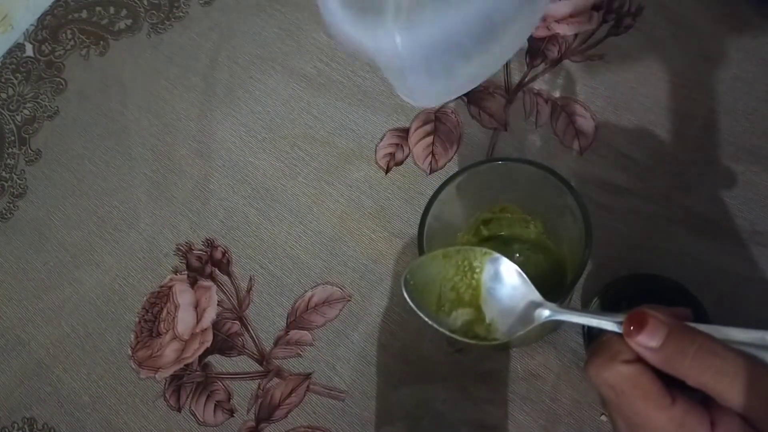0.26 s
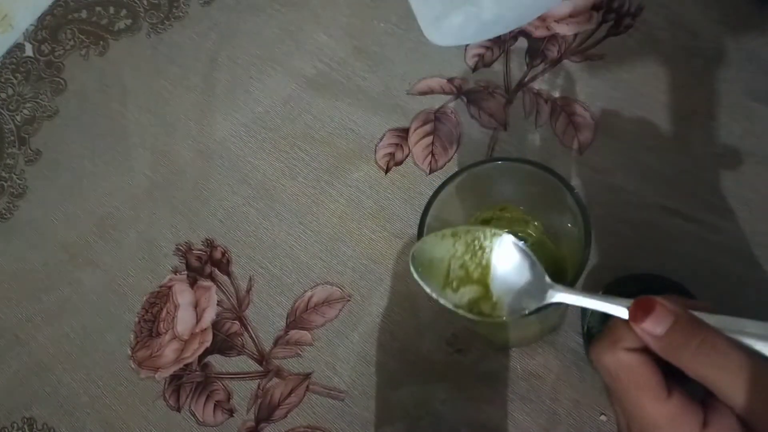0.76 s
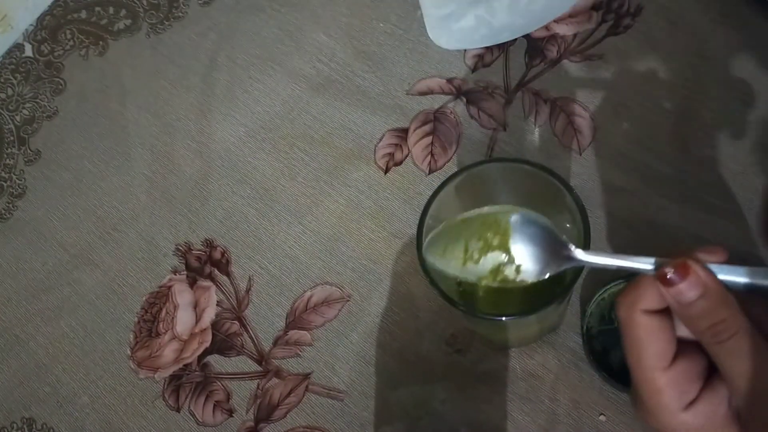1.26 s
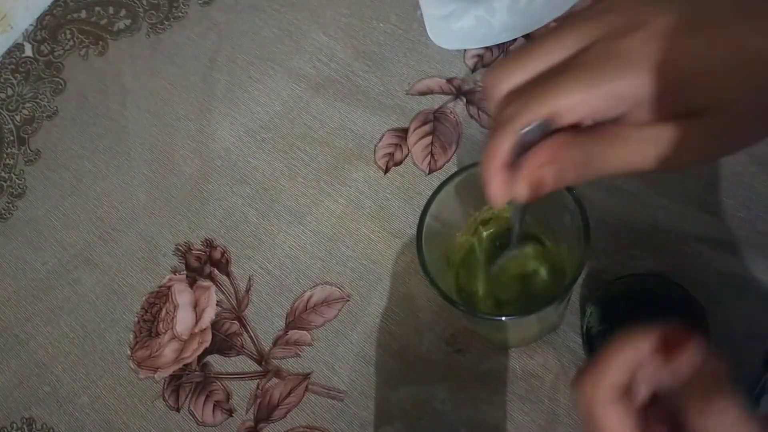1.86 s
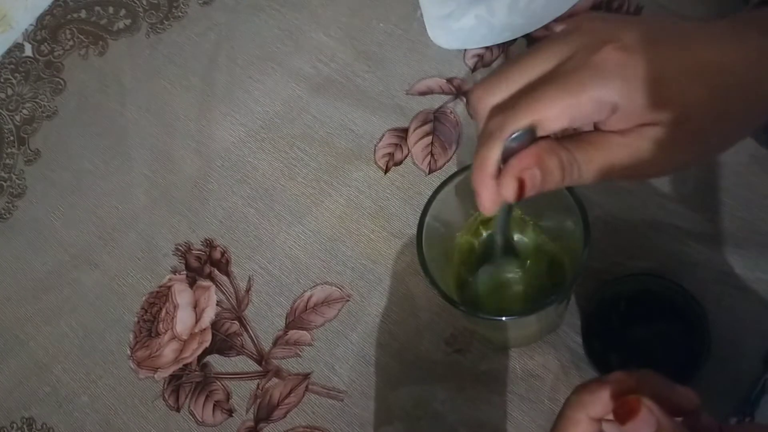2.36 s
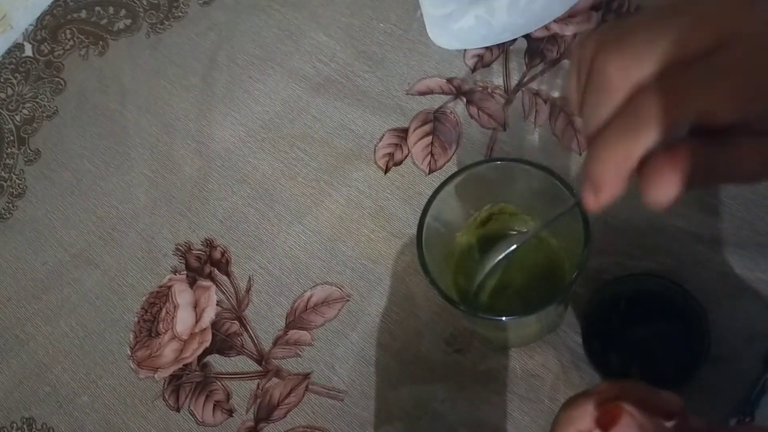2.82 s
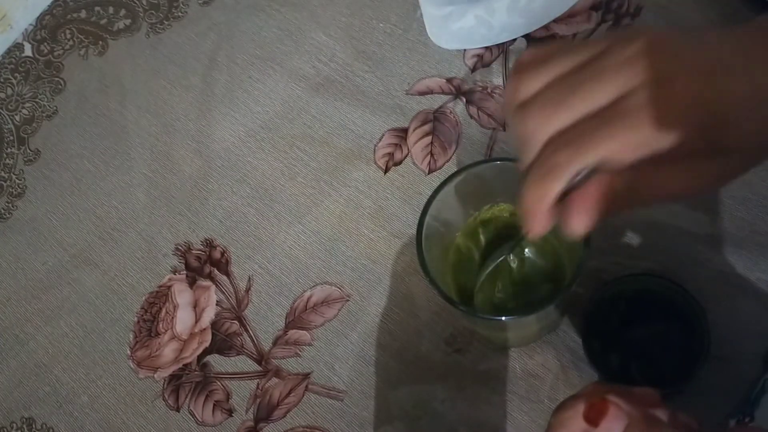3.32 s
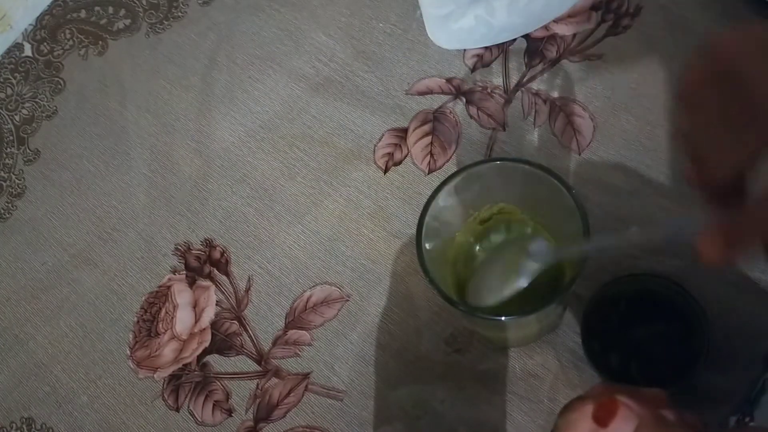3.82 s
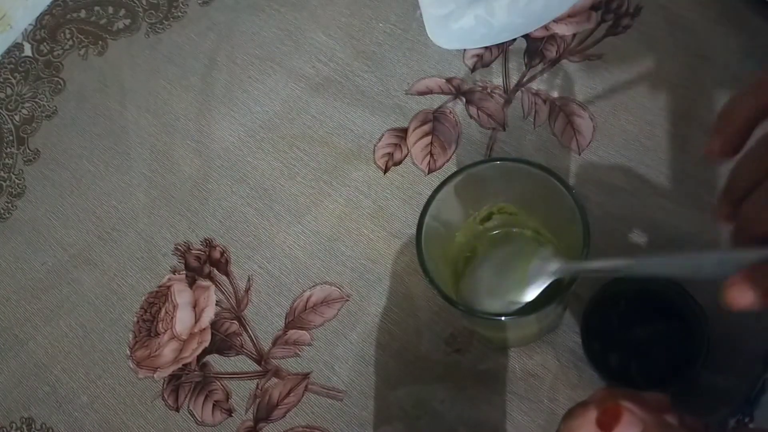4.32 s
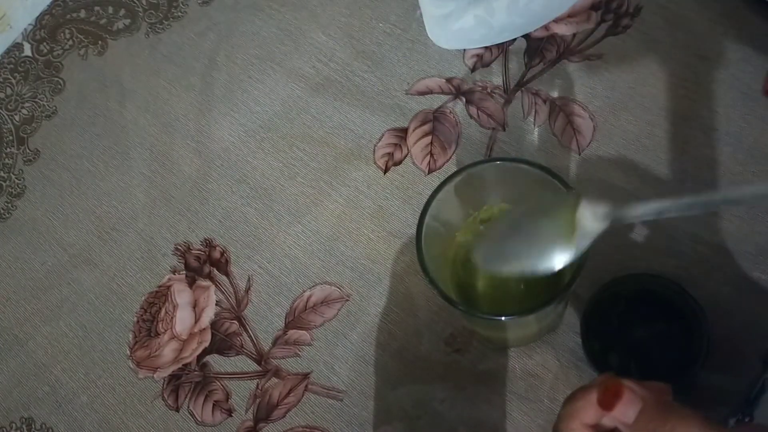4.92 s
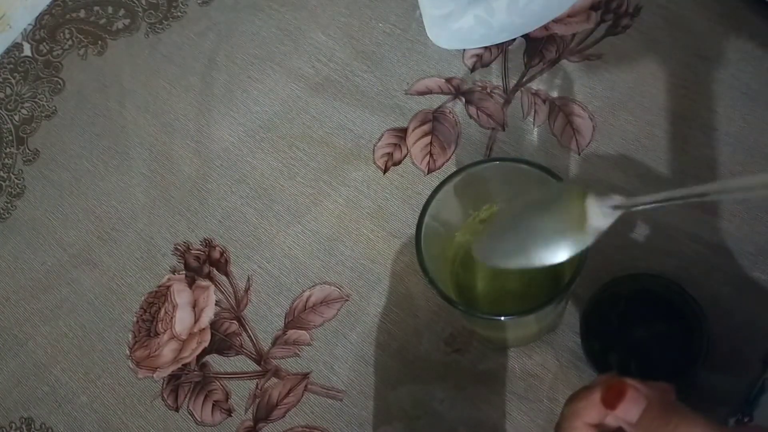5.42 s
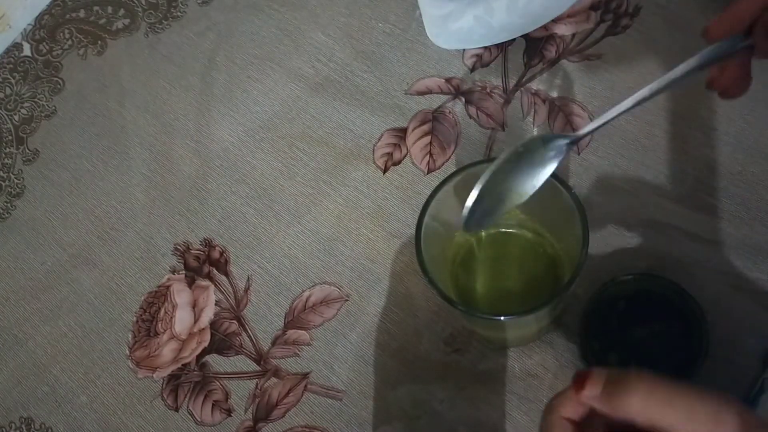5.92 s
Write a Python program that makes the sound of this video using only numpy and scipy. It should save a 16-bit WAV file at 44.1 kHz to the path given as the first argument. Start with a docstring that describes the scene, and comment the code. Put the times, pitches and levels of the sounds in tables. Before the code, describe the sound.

A few drips and a jug set down, then a steel spoon clinks sharply in a glass, stirring over a ceiling fan's hum.

```python
"""Last drops fall from a plastic jug into a glass of water, over the hum and throb of a three-bladed
ceiling fan in a small kitchen. The jug is set down and the table top booms. Then the main sound, close
under the phone's microphone: a steel spoon stirs in powder and knocks the wall of the glass, and both
steel and glass ring. Soft swishes of hiss come and go; the kitchen's steady noise lies behind it all."""
import sys
import numpy as np
from scipy import signal
from scipy.fft import rfft, irfft, next_fast_len
from scipy.io import wavfile
from scipy.ndimage import uniform_filter1d

SR = 44100
rng = np.random.default_rng(int(sys.argv[2]) if len(sys.argv) > 2 else 0)


def wrap_up_sound(samples):
    """Save the sound to the file named by the first command line argument, as 16-bit audio."""
    columns = np.atleast_2d(samples).T
    # keep every value between -1 and 1, then stretch to whole-number steps
    tamed = np.clip(columns, -1, 1)
    steps = np.round(tamed * 32767).astype(np.int16)
    wavfile.write(sys.argv[1], SR, steps)


N = 272394


def undb(db):
    """Gain of a level in dB."""
    return 10 ** (np.asarray(db) / 20)


def level(x, db):
    """Scale to an rms level."""
    return x * undb(db) / np.sqrt(np.mean(x ** 2))


def colour(x, points):
    """Shape a sound by (Hz, dB) points."""
    hz, db = np.transpose(points)
    size = next_fast_len(len(x))
    bins = np.maximum(np.arange(size // 2 + 1) * SR / size, 1)
    gain = undb(np.interp(np.log(bins), np.log(hz), db))
    return irfft(rfft(x, size) * gain, size)[:len(x)]


def band(x, hz, width_hz):
    """One resonance."""
    return signal.lfilter(*signal.iirpeak(hz, hz / width_hz, fs=SR), x)


def walk(rate_hz):
    """A smooth random drift with a spread near 1."""
    hold = int(SR / rate_hz)
    steps = np.repeat(rng.standard_normal(N // hold + 1), hold)
    return 1.3 * uniform_filter1d(uniform_filter1d(steps, hold), hold)[:N]


def add(out, start_s, sound):
    """Mix a sound in at its start time."""
    i = int(start_s * SR)
    out[i:i + len(sound)] += sound[:N - i]


def ring(hz, t60, attack_s, turn=0):
    """A struck mode: it swells for twice attack_s, then dies away."""
    t = np.arange(int(SR * (t60 + 4 * attack_s))) / SR
    swell = np.sin(np.pi / 2 * np.minimum(t / (2 * attack_s), 1)) ** 2
    fade = np.exp(-np.log(1000) * np.maximum(t - 2 * attack_s, 0) / t60)
    return swell * fade * np.sin(2 * np.pi * (hz * t + turn))


def burst(decay_s, attack_s=.0001):
    """A short spit of noise."""
    t = np.arange(2600) / SR
    return rng.standard_normal(len(t)) * np.exp(-t / decay_s) * (1 - np.exp(-t / attack_s))


SHAFT_HZ, SLOTS, BLADES = 4.35293, 84, 3  # the fan overhead
# Room tone of the kitchen. Each row: frequency in Hz, relative noise density in dB.
ROOM_TONE = [(40, -42), (140, -26.5), (260, -21.5), (440, -17), (540, -24.5), (700, -19.5), (1320, -25),
             (2600, -33.5), (4000, -50), (6000, -55), (6950, -48), (7700, -57), (8600, -50), (11000, -63),
             (16300, -78)]


def kitchen(t):
    """Distant household noise and air from the fan, puffing once a turn and swelling a little."""
    puff_db = 2.5 * np.exp(-((SHAFT_HZ * t + 0.059) % 1) / 0.17)
    swell = undb(uniform_filter1d(puff_db, size=900) + .4 * walk(1.5) + .9 * walk(9))
    return level(colour(rng.standard_normal(N) * swell, ROOM_TONE), db=-45.5)


# Reverberation of the small kitchen. Each row: frequency in Hz, time to fall 60 dB in seconds.
ROOM_DECAY = [(100, 0.53), (2000, 0.35), (8000, 0.28), (16000, 0.12)]


def room(close, echo_db=-14):
    """The walls' many echoes reach the microphone behind the close sound, as bands of fading noise."""
    t, tail = np.arange(SR // 2) / SR, 0
    hz, t60 = np.transpose(ROOM_DECAY)
    for centre in 125 * 2. ** np.arange(8):
        fade = np.exp(-np.log(1000) * t / np.interp(np.log(centre), np.log(hz), t60))
        tail += band(rng.standard_normal(len(t)), centre, centre * 0.57) * fade
    tail *= 1 - np.exp(-t / 0.007)
    tail /= np.sqrt(np.sum(tail ** 2))
    return close + undb(echo_db) * signal.fftconvolve(close, tail)[:N]


# Level of the low hum, raised around the jug's landings and the late clinks.
# Each row: time in seconds, level in dB.
HUM_LEVELS = [(0.0, -42.5), (0.1, -43.5), (0.26, -44.5), (0.65, -45.5), (0.83, -40), (1.03, -40.5),
              (1.43, -42.5), (1.86, -42), (4.06, -40), (4.18, -42), (5.28, -45.5), (5.9, -42),
              (6.07, -46.5), (6.18, -43.5)]


def fan_hum(t):
    """The rotor slots sing; the shaft wobbles once a turn and the blades throw shifted echoes."""
    turn = SHAFT_HZ * t
    wobble = 0.25 * np.sin(2 * np.pi * (turn - .42))
    tone = np.exp(2j * np.pi * SLOTS * turn + 1j * wobble)
    blade = np.exp(2j * np.pi * (BLADES * turn - 0.15))
    echoed = tone * (1 + 0.44 / blade + 0.051 * blade)  # one echo below the tone, a faint one above
    sway = 1 + 0.22 * np.cos(2 * np.pi * (turn + 0.037))  # the fan leans nearer and further
    return level(echoed.real * sway, 0) * undb(np.interp(t, *np.transpose(HUM_LEVELS)))


# Resonances of the fan's housing. Each row: frequency in Hz, filter width in Hz, level in dB.
HOUSING_BANDS = [(429, 23.5, -61), (677.8, 70, -52), (1316, 9.9, -73.5), (2584, 23, -70.5)]


def fan_whir(t):
    """Up at the ceiling, a rub once a turn rings the housing."""
    turn = SHAFT_HZ * t
    # the same spot rubs on every turn, so part of the noise repeats
    spot = rng.standard_normal(SR)[(turn % 1 * SR / SHAFT_HZ).astype(int)]
    throb = np.exp(0.46 * np.cos(2 * np.pi * (turn + 0.013)))
    rub = (0.4 * spot + rng.standard_normal(N)) * throb
    return sum(level(band(band(rub, hz, width), hz, width), db) for hz, width, db in HOUSING_BANDS)


# Soft swishes of hiss. Each row: peak time in seconds, level in dB, fade in dB per second.
SWISHES = [(.27, -77, 80), (.34, -74, 260), (4.66, -66, 35), (5.304, -65, 46), (5.55, -72.5, 128.5),
           (5.724, -67.5, 60), (5.95, -66, 50)]


def fine_hiss(t, attack_s=0.025):
    """Soft swishes, and the fading hiss after the last clink: each rises quickly and dies away."""
    gain = 0
    for peak_s, db, fade in SWISHES:
        rise = np.clip(1 + (t - peak_s) / attack_s, 0, 1) ** 2
        gain += rise * undb(db - fade * np.maximum(t - peak_s, 0))
    hiss = band(rng.standard_normal(N), 3600, 2300) + 0.41 * band(rng.standard_normal(N), 8400, 2500)
    flicker = undb(2.1 * walk(40))
    return gain * level(band(hiss, 5600, 7400) * flicker, db=0.53)


# Modes of the table top. Each row: frequency in Hz, relative level in dB, time to fall 60 dB in seconds.
TABLE_MODES = [(129.5, -2.5, 0.17), (160.8, -6, 0.2), (222, 3.5, 0.048), (271, 1, 0.073), (422, 1.5, 0.06),
               (560, 1, 0.024), (697, -7.5, 0.055), (922, -8.5, 0.053)]


def table_boom(blow_db):
    """The table under the glass booms, its modes balanced a little differently at each blow."""
    out = np.zeros(SR // 2)
    for hz, db, t60 in TABLE_MODES:
        scatter_db = 2.5 * rng.standard_normal()
        add(out, 0, undb(blow_db + db + scatter_db) * ring(hz, t60, 0.00089))
    return out


# The jug landing nearby. Each row: start in seconds, level in dB, gap between bounces in seconds.
JUG_LANDINGS = [(0.8212, -26.5, .011), (1.0823, -27.5, .025)]


def jug(bounces=2, bounce_thud_db=-3, bounce_slap_db=-10):
    """The jug's base booms the table, pushes the air and slaps faintly, weaker on each bounce."""
    thuds, slaps = np.zeros(N), np.zeros(N)
    for start_s, db, gap_s in JUG_LANDINGS:
        for bounce in range(bounces + 1):
            hit_s = start_s + bounce * gap_s
            slap_gain = undb(db + bounce * bounce_slap_db)
            add(thuds, hit_s, table_boom(db + bounce * bounce_thud_db))
            add(thuds, hit_s, 2.2 * slap_gain * ring(530, 0.011, 0.00028))  # the push of air
            add(slaps, hit_s, 1.4 * slap_gain * burst(0.0025))
    return thuds + band(band(band(slaps, 1500, 2300), 1500, 2300), 1800, 3000)


# Drops and small ticks, close to the microphone.
# Each row: start in seconds, tick level in dB, bubble's starting pitch in Hz, bubble level in dB.
DRIPS = [(.1674, -51, 3620, -62), (0.21, -66, 3500, -40.5), (.249, -31.5, 8060, -36),
         (0.2993, -60, 4540, -47), (.321, -48, 8500, -47), (0.337, -47, 4630, -37.5),
         (0.3536, -53, 7500, -46), (.3745, -49, 8800, -51), (0.408, -52, 8600, -53), (.719, -68, 4570, -57),
         (.994, -49, 8550, -43), (1.034, -42, 8700, -45), (1.071, -52, 8650, -49), (5.948, -60, 5000, -49)]


def drops(plop_db=-1.5):
    """A bright tick, a tiny bubble whose pitch rises as it surfaces, a plop of the air in the glass."""
    tones, ticks = np.zeros(N), np.zeros(N)
    t = np.arange(600) / SR
    envelope = np.exp(-t / 0.0013) * (1 - np.exp(-t / 0.0002))
    for start_s, tick_db, hz, bubble_db in DRIPS:
        bubble = envelope * np.sin(2 * np.pi * hz * t * (1 + 12 * t))
        add(tones, start_s, undb(bubble_db) * bubble)
        add(tones, start_s, undb(bubble_db + plop_db) * ring(1036, 0.032, 0.0026))
        add(ticks, start_s, undb(tick_db) * burst(0.0017))
    return tones + band(band(ticks, 8900, 5000), 9500, 8000)


def family_levels(crack_db, handle_db, bowl_db, glass_db, bright_db, in_drink):
    """How hard a blow drives each family of modes in spoon and glass, in dB."""
    return (handle_db,                                                   # 0 spoon handle
            glass_db,                                                    # 1 rim, low
            bowl_db,                                                     # 2 spoon bowl
            glass_db + 1.33 * bright_db + (-4.5 if in_drink else -8.5),  # 3 rim, 1.33 octaves up
            crack_db + (-13 if in_drink else -11),                       # 4 spoon tip
            glass_db + 1.76 * bright_db,                                 # 5 rim, high, near 9.3 kHz
            crack_db + (-22 if in_drink else -9),                        # 6 rim, top
            crack_db + (7.5 if in_drink else 4))                         # 7 spoon edge


# Modes of spoon and glass; the uneven glass splits its rings into twins. Each row: family number,
# twin 0 or 1, frequency in Hz, relative level in dB, time to fall 60 dB in seconds (spoon in air).
CLINK_MODES = [(0, 0, 1037, 0, .12), (0, 1, 990, -3, .09), (1, 0, 2057, 0, .36), (1, 1, 2031, 0, .36),
               (1, 0, 2116, -8, .22), (1, 0, 2159, -9, .22), (1, 1, 2465, -18, .15), (2, 0, 3075, -1, .07),
               (2, 0, 3190, -7, .08), (2, 1, 3440, 0, .07), (3, 1, 5178, 0, .34), (3, 0, 5196, -2, .3),
               (3, 0, 5060, -14, .2), (3, 1, 5360, -18, .2), (4, 0, 6551, 0, .09), (4, 1, 7400, -6, .07),
               (5, 0, 9240, -2, .17), (5, 0, 9320, -3, .22), (5, 1, 9440, -4, .21), (5, 1, 9157, -8, .2),
               (5, 0, 9385, -7, .22), (6, 0, 14510, 0, .15), (6, 1, 14490, -1, .14), (6, 0, 13455, -8, .1),
               (6, 1, 4484, -3, .08), (7, 0, 8350, -4, .06), (7, 1, 8500, -3, .07), (7, 0, 8620, -3, .07),
               (7, 1, 8900, -6, .06)]


def struck_modes(family_db, place, contact_s, lasting_db, in_drink):
    """Each mode clanks while spoon and glass touch, then leaves a thinner, lasting ring."""
    twin_gain = np.cos(2 * np.pi * place), np.sin(2 * np.pi * place)
    ring_share = 0.64 if in_drink else 1
    for family, twin, hz, db, t60 in CLINK_MODES:
        turn, detune = rng.random(), rng.random() - .5
        gain = twin_gain[twin] * undb(family_db[family] + db)
        # in touch, the two bodies damp and detune each other
        clank = 1.18 * gain * ring(hz * (1 + 0.015 * detune), 0.19 * t60, contact_s, turn)
        free = gain * ring(hz * (1 + 0.0011 * detune), ring_share * t60, contact_s, turn)
        wall_db = -2.26 * np.log2(hz / 2000)  # the wet wall soaks up the high rings most
        yield family, clank, undb(lasting_db + wall_db) * free


# Tone of the crack of steel on glass. Each row: frequency in Hz, gain in dB.
CRACK_TONE = [(300, 16), (1000, 21), (2000, 21.5), (3200, 20), (5500, 7.5), (7500, 17.5), (8500, 11.5),
              (9800, 17), (12000, 4), (15000, -1), (16400, -20)]
# Blows of the spoon. Each row: start in seconds, levels of crack, handle, bowl and glass in dB,
# glass brightness in dB per octave, place round the rim in turns, contact in ms (capped at 8 below),
# relative level of the lasting ring in dB.
SPOON_BLOWS = [(1.537, -28, -24, -29, -27, 4.5, 0.072, .6, -3.5),
               (1.5504, -46.5, -31, -41, -29.5, 4.5, 0.16, 0.59, -4.5),
               (1.5784, -30, -26.5, -26.5, -23, 2.7, 0.064, 0.91, -11.5),
               (1.5853, -44.5, -42, -46, -26.5, -5, .068, 0.99, -10),
               (1.6485, -27, -38, -34, -27.5, 2, 0.091, 1.03, -8.5),
               (1.8744, -34, -34.5, -33, -21.5, 1, 0.18, 0.83, -1),
               (2.2350, -59, -32.5, -43, -51, -7, 0.13, 1.1, -10),
               (2.4015, -38.5, -26.5, -22, -27, -17, 0.19, 0.62, -6.5),
               (2.5358, -29, -35.5, -19.5, -31, -3, 0.061, 1.36, -6.5),
               (2.6523, -53.5, -47, -39, -35.5, -10.5, 0.13, 0.51, -27),
               (2.6600, -64, -31.5, -30, -61, -4, 0.11, 0.32, -14),
               (2.7604, -76.5, -40, -51, -53, -13, 0.11, 0.72, -8),
               (2.7817, -65, -40, -47, -50, -11, 0.11, 0.64, -11),
               (3.1887, -40, -33, -47, -38.5, -9, 0.076, 0.92, -2),
               (3.2131, -47.5, -39, -44, -43, -11, 0.061, 1.7, -7),
               (3.3917, -80, -34.5, -40.5, -50, -14, 0.019, 2.2, -10),
               (4.0498, -32.5, -22.5, -36.5, -46.5, 8.5, 0.15, 3.6, -3.5),
               (4.0821, -37.5, -25.5, -35, -55, 14.5, 0.29, 2.4, -1),
               (4.0974, -40, -32, -50, -57, 10, 0.21, 2.6, -3.5),
               (4.1226, -30.5, -31, -28, -29.5, 6, 0.05, 0.5, -20),
               (4.1663, -49, -37.5, -51, -40, -10, 0.15, 0.88, -11),
               (4.44, -74, -60.5, -73, -70, 5, 0.19, 9.3, 3),
               (4.4720, -59, -61.5, -66, -62.5, 3, 0.082, 1.5, 3),
               (4.501, -34.5, -29, -23.5, -20.5, 1.5, 0.1, 0.84, -18)]


def spoon_on_glass(in_drink_s=(2.05, 3.7)):
    """Close under the microphone each blow cracks, clanks and rings, more briefly below the surface."""
    clanks, cracks, families = np.zeros(N), np.zeros(N), np.zeros((8, N))
    for blow in SPOON_BLOWS:
        start_s, crack_db, handle_db, bowl_db, glass_db, bright_db, place, contact_ms, lasting_db = blow
        in_drink = in_drink_s[0] < start_s < in_drink_s[1]
        contact_s = min(contact_ms, 8) / 1000
        family_db = family_levels(crack_db, handle_db, bowl_db, glass_db, bright_db, in_drink)
        for family, clank, lasting in struck_modes(family_db, place, contact_s, lasting_db, in_drink):
            add(clanks, start_s, clank)
            add(families[family], start_s, lasting)
        snap = burst(0.00075 + contact_s, 1.7 * contact_s)
        tail = 0.26 * band(burst(0.0089, contact_s), 5000, 9000)
        add(cracks, start_s, undb(crack_db) * (snap + tail))
        add(clanks, start_s, table_boom(handle_db - 19))  # the glass passes the blow to the table
    # the sloshing drink makes each family of rings waver on its own
    rings = sum(family * undb(3.2 * walk(39.985)) for family in families)
    return clanks + rings + colour(cracks, CRACK_TONE)


def scene():
    """One microphone above the glass: near sounds echo in the kitchen; fan and air fill it."""
    t = np.arange(N) / SR
    close = spoon_on_glass() + drops() + jug()
    return (room(close) + fine_hiss(t) + fan_hum(t) + fan_whir(t) + kitchen(t))[None]


def record(dry):
    """The phone cuts the deep bass and the very top."""
    low_cut = signal.butter(3, 95, "highpass", fs=SR, output="sos")
    high_cut = signal.ellip(10, .2, 80, 16400, fs=SR, output="sos")
    return signal.sosfilt(high_cut, signal.sosfilt(low_cut, dry))


dry = scene()
out = record(dry)
wrap_up_sound(out)
```